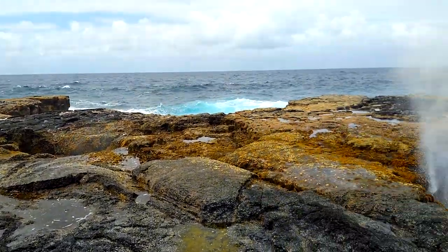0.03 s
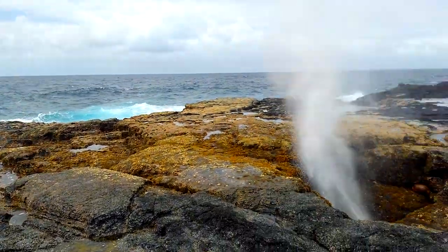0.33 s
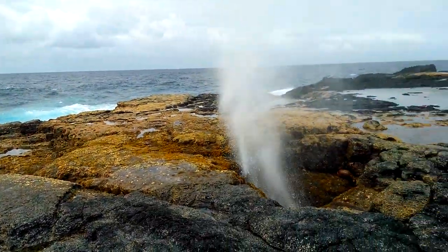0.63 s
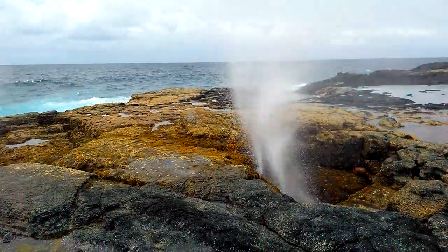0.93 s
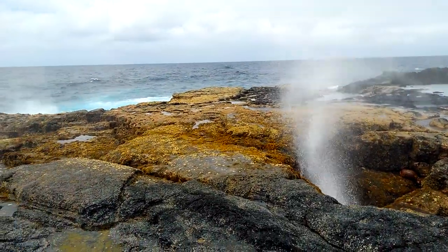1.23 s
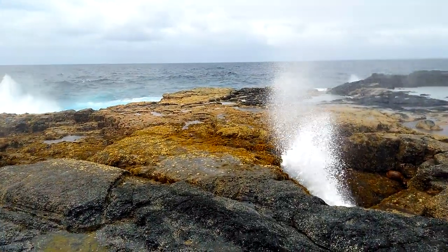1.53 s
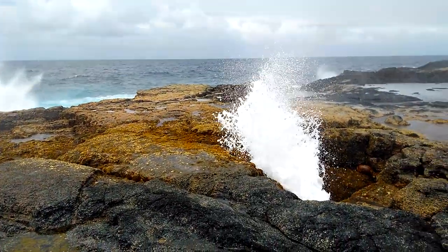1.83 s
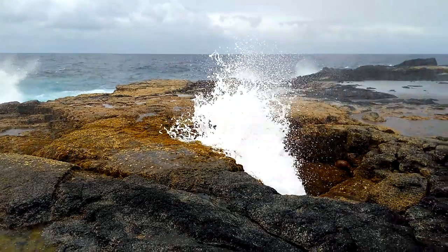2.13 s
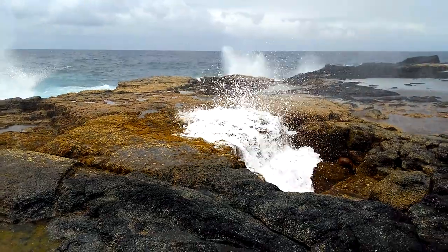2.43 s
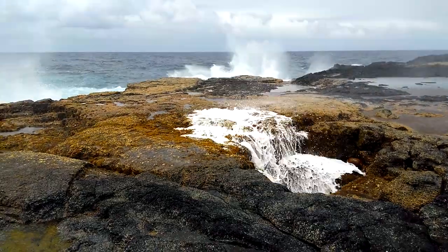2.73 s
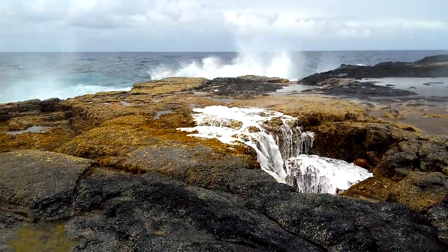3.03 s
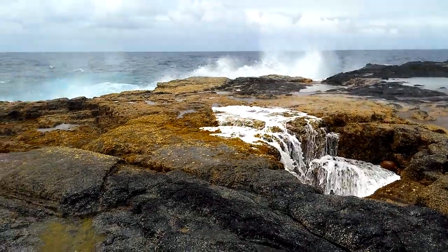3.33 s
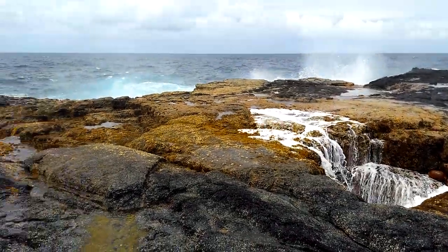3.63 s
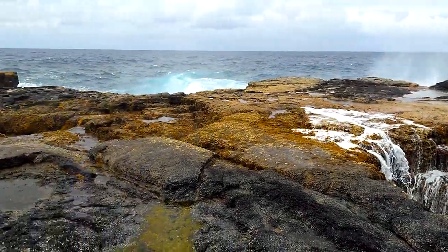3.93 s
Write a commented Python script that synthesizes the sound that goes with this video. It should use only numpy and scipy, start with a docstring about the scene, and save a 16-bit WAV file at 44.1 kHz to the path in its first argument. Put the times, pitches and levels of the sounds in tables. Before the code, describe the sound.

A blowhole hisses and sprays in surges, strongest at about 0.1 and 1.2 seconds and again around 2.4, with pattering drops and a very faint breathy whistle. Surf roars behind it, and water washes over the rock near 1.2 and 2.3 seconds. The hiss dies away by 3 seconds. Gusty wind rumbles and thumps on the microphone throughout, hardest just before 4 seconds.

```python
"""A blowhole on a rock shelf blows a hissing jet of mist and water, and its spray splashes down on the rock.
The mouth adds a faint, breathy whistle that sinks from one blow to the next as water fills it.
Behind it surf roars and water washes over the shelf. Gusty wind rumbles and thumps on the two ports of
a small microphone, whose stereo widener feeds each port, delayed and inverted, into the other channel."""
import sys
import numpy as np
from scipy import signal
from scipy.fft import rfft, irfft, next_fast_len
from scipy.io import wavfile
from scipy.ndimage import uniform_filter1d, minimum_filter1d, map_coordinates

SR = 44100
rng = np.random.default_rng(int(sys.argv[2]) if len(sys.argv) > 2 else 0)


def log_audio(samples):
    """Write samples as a 16-bit WAV file to the path given in sys.argv[1]."""
    # one column per channel
    frames = np.atleast_2d(samples).T
    # limit to full scale, then quantise
    limited = np.clip(frames, -1, 1)
    pcm = np.round(limited * 32767).astype(np.int16)
    wavfile.write(sys.argv[1], SR, pcm)


N = 176400


def amp(db):
    """Decibels to gain."""
    return 10 ** (np.asarray(db) / 20)


def unit(x):
    """Scale to rms 1."""
    return x / np.sqrt(np.mean(x ** 2) + 1e-20)


def along(points, hz):
    """Read (f/Hz, value) points on a log frequency axis."""
    freqs, values = np.transpose(points)
    return np.interp(np.log(hz + 1), np.log(freqs + 1), values)


def envelope(rows):
    """One value per sample from (t/s, value) breakpoints."""
    return np.interp(np.arange(N) / SR, *np.transpose(rows))


def wobble(per_s):
    """Smooth random modulation with per_s knots a second."""
    return map_coordinates(rng.standard_normal(4096), [np.arange(N) * per_s / SR], mode="wrap")


def filtered(x, response):
    """Filter x by a complex response, given as a function of frequency."""
    size = next_fast_len(N + SR // 2)
    return irfft(rfft(x, size) * response(np.fft.rfftfreq(size, 1 / SR)), size)[..., :N]


def noise_bed(colour, alike, patchy_db):
    """Coloured noise of rms 1, mottled in time and frequency; alike is the correlation of the ports."""
    spectra = signal.stft(rng.standard_normal((2, N)), nperseg=512)[2]
    patches = uniform_filter1d(rng.standard_normal(spectra.shape[1:]), size=7, axis=0)
    patches = uniform_filter1d(patches, size=10, axis=1)
    mid, side = signal.istft(spectra * amp(patchy_db * unit(patches)), nperseg=512)[1][:, :N]
    width = np.arccos(alike) / 2
    mid, side = mid * np.cos(width), side * np.sin(width)
    return unit(filtered(np.array([mid + side, mid - side]), lambda hz: amp(along(colour, hz))))


# Rise and fall of the gusts: t/s, level/dB
GUSTS = [(0, -29), (.18, -31), (.25, -31), (.46, -34.5), (.61, -33.5), (.68, -26), (.77, -29), (.85, -35),
         (1.02, -30), (1.12, -32.5), (1.33, -28.5), (1.48, -28.5), (1.59, -29.5), (1.68, -25), (1.85, -33),
         (1.99, -35), (2.17, -32), (2.3, -29), (2.38, -36), (2.46, -26.5), (2.61, -34.5), (2.75, -34),
         (2.82, -29), (3.01, -29.5), (3.17, -30), (3.3, -34), (3.47, -33.5), (3.6, -25.5), (3.68, -27.5),
         (3.78, -25.5), (3.88, -22), (3.93, -24.5), (3.97, -26.5), (4, -22)]
# Tone of the low rumble: f/Hz, level/dB
RUMBLE_EQ = [(20, -31), (35, -24), (60, -5.5), (130, 3), (220, -2), (380, -14.5), (700, -34.5),
             (1300, -46.5), (3000, -79)]
# Tone of the flutter: f/Hz, level/dB
FLUTTER_EQ = [(80, -46), (200, 4), (350, 0.5), (700, -10), (1200, -27), (2200, -50), (5000, -67)]

def wind(lee_gain=0.55, flutter_growth=1.78):
    """Gusts drive a low rumble and a spikier, brighter flutter, mostly on the windward port."""
    strength_db = envelope(GUSTS)
    mean_db = strength_db.mean()
    gust_db = strength_db - mean_db + .5 * wobble(30.13)
    rumble_db = 11.5 + gust_db + 1.8 * wobble(90)
    rumble = amp(rumble_db) * noise_bed(RUMBLE_EQ, alike=0.15, patchy_db=0.58)
    flutter_db = -5 + flutter_growth * gust_db + 3.8 * wobble(170)
    flutter = amp(flutter_db) * noise_bed(FLUTTER_EQ, alike=0.15, patchy_db=-1)
    return amp(mean_db) * (rumble + flutter) * np.array([[1], [lee_gain]])


# Eddies hitting the microphone: t/s, length/s, level/dB, upper edge f/Hz
EDDY_HITS = [(.079, 0.021, -12.5, 306), (.198, 0.0026, -7.5, 754), (0.208, 0.017, -10, 590),
             (.219, 0.02, -8, 229), (0.551, 0.0048, -18, 223), (0.639, 0.0052, -11, 222),
             (0.714, 0.021, -22, 565), (.745, 0.0088, -15, 278), (0.777, 0.016, -10, 232),
             (1.018, 0.0026, -20, 465), (1.074, 0.013, -9.5, 188), (1.14, 0.003, -22, 550),
             (1.172, 0.015, -14.5, 420), (1.23, 0.012, -10.5, 231), (1.276, 0.015, -12, 270),
             (1.334, 0.011, -10.5, 390), (1.496, 0.003, -14.5, 448), (1.636, 0.0068, -20, 340),
             (1.746, 0.02, -12.5, 248), (1.919, 0.011, -12, 213), (2.145, 0.0082, -9.5, 355),
             (2.495, 0.016, -8, 253), (2.534, 0.006, -17, 555), (2.795, 0.0026, -15, 420),
             (2.918, 0.0042, -13, 348), (2.949, 0.0049, -11, 513), (2.963, 0.013, -9.5, 220),
             (3.071, .008, -12, 200), (3.095, 0.0087, -10, 290), (3.148, .005, -20.5, 603),
             (3.169, 0.0071, -17.5, 500), (3.277, 0.0082, -16, 278), (3.403, 0.0055, -13.5, 220),
             (3.525, 0.0056, -16, 384), (3.596, 0.0044, -10, 402), (3.623, 0.0091, -21, 280),
             (3.824, 0.024, -8.5, 170), (3.879, 0.019, -2, 190), (3.896, 0.005, -2, 240),
             (3.922, 0.0091, -6.5, 340), (3.9357, 0.0025, -2.5, 800), (3.981, 0.0063, -3, 340)]

def wind_thumps(lee_gain=0.083, crack_s=3.9355, crack_hz=3500):
    """Single eddies strike the windward port: one push of pressure inside a short burst of turbulence."""
    t = np.arange(SR // 4) / SR - 1 / 8
    hz = np.fft.rfftfreq(len(t), 1 / SR)
    push = signal.unit_impulse(len(t), "mid")
    track = np.zeros(N + SR)
    for at_s, length_s, db, edge_hz in EDDY_HITS:
        window = np.exp(-2 * (t / length_s) ** 2)
        band = hz / np.hypot(hz, .3 * edge_hz) / (1 + (hz / edge_hz) ** 3.81)
        shaped = lambda x: unit(irfft(rfft(x) * band, len(t)))
        turbulence = shaped(rng.standard_normal(len(t)) * window)
        roughness = 0.77 * length_s / 0.0048  # longer eddies are rougher
        eddy = unit(shaped(push) + roughness * turbulence)
        track[round(at_s * SR):][:len(t)] += amp(db) * eddy * np.sqrt(np.mean(window ** 2))
    thumps = track[len(t) // 2:][:N]  # centre each thump on its cue
    # The hardest eddy lands with a sharp crack.
    click = signal.unit_impulse(N, round(crack_s * SR))
    crack = filtered(click, lambda f: 1 / (1 + 1j * f / crack_hz) ** 2)
    return (thumps + amp(-11) * crack) * np.array([[1], [lee_gain]])


# Swells of the breakers: t/s, level/dB
SURF_SWELLS = [(0, -28.5), (.12, -41), (.33, -47.5), (.59, -38.5), (.78, -33), (.95, -37), (1.3, -34),
               (1.7, -41), (1.9, -43), (2.07, -44), (2.35, -35), (2.58, -50), (3.15, -46), (3.4, -45),
               (3.55, -47.5), (3.83, -45.5), (4, -52)]
# Tone of their roar: f/Hz, level/dB
SURF_EQ = [(60, -0.5), (250, 12.5), (500, 10), (900, 7.5), (1300, -9), (1900, -2.5), (2600, -23.5),
           (4000, -35), (7000, -33.5), (15000, -41)]

def surf():
    """Breakers roar along the shelf."""
    roar_db = envelope(SURF_SWELLS) - 1 + 1.5 * wobble(26)
    return amp(roar_db) * noise_bed(SURF_EQ, alike=0.89, patchy_db=-0.8)


# Surges of water across the shelf: t/s, level/dB
WASH_SURGES = [(0, -54.5), (1.2, -40), (1.6, -46.5), (2.1, -46), (2.35, -39), (2.6, -57), (3.2, -57.5),
               (3.48, -50), (4, -50.5)]
# Tone of the running water: f/Hz, level/dB
WASH_EQ = [(500, 6), (1100, -0.5), (1600, -0.5), (2100, -2), (2800, -8.5), (4000, -26), (8000, -47)]

def wash():
    """Water runs over the rock and drains away in a wide, churning wash."""
    return amp(envelope(WASH_SURGES)) * noise_bed(WASH_EQ, alike=0.1, patchy_db=5.0)


# Narrow resonances of the blowhole's mouth: centre t/s, half length/s, f/Hz, level/dB
WHISTLES = [(.7, 0.37, 4370, -62), (1.254, .17, 3370, -56), (2.318, 0.25, 2950, -55.5)]

def mouth_whistle(width_hz=250):
    """The mouth rings with a faint, breathy whistle, lower each time as water fills it."""
    t, out = np.arange(N) / SR, np.zeros((2, N))
    for centre_s, half_s, pitch_hz, db in WHISTLES:
        resonance = lambda hz: 1 / (1 + (2 * (hz - pitch_hz) / width_hz) ** 2)
        breath = unit(filtered(rng.standard_normal((2, N)), resonance))
        swell = np.exp(-((t - centre_s) / half_s) ** 4)
        out += amp(db) * swell * breath
    return out


def spray_drops(per_s=990, centre_hz=2620, spread_octaves=2.4, ring_cycles=3.2):
    """Drops of spray hit the rock: tiny damped pings, scattered between the ports."""
    when, size, pan, pitch = rng.random((int(per_s * N / SR), 4)).T
    hz = centre_hz * 2 ** (spread_octaves * (pitch - .5))
    drop_db = np.minimum(-4 * np.log(1 - size), 13)  # many soft drops, a few loud ones
    age = np.arange(SR // 200)
    cycles = hz[:, None] * age / SR
    pings = amp(drop_db)[:, None] * np.sin(2 * np.pi * cycles) * np.exp(-2 * cycles / ring_cycles)
    at = ((when * N).astype(int)[:, None] + age).ravel()
    ports = [np.bincount(at, (pings * gain[:, None]).ravel(), N)[:N] for gain in (pan, 1 - pan)]
    return unit(np.array(ports))


# Plumes of mist: t/s, level/dB
MIST_PLUMES = [(0, -52.5), (.12, -45), (.37, -48.5), (.55, -47), (.75, -45.5), (.83, -48), (1.24, -47.5),
               (1.38, -51), (1.68, -52.5), (1.79, -70), (1.88, -58), (1.96, -61), (2.08, -51.5),
               (2.2, -53.5), (2.33, -48.5), (2.48, -48), (2.52, -53), (2.65, -49.5), (2.88, -52.5),
               (3.02, -62), (3.19, -78.5), (3.36, -71.5), (3.6, -65), (3.9, -74.5), (4, -67)]
# Tone of their hiss: f/Hz, level/dB
MIST_EQ = [(1500, 4.5), (4000, -53), (6000, -10.5), (7300, 0), (8500, 3.5), (10000, 2.5), (12000, 5),
           (14300, 5), (15600, 2.5)]

def mist():
    """Fine mist blown from the hole gives a wide, airy hiss."""
    hiss_db = envelope(MIST_PLUMES) + 4.5 + 0.34 * wobble(30.96)
    return amp(hiss_db) * noise_bed(MIST_EQ, alike=0.073, patchy_db=1.64)


# Blows of the jet: t/s, level/dB
JET_BLOWS = [(0, -45), (.13, -36.5), (.35, -43.5), (.54, -46.5), (.7, -43), (.9, -44.5), (1.06, -46),
             (1.2, -40.5), (1.38, -47.5), (1.48, -52.5), (1.7, -53), (1.79, -64), (1.99, -66),
             (2.11, -53.5), (2.22, -54.5), (2.42, -45), (2.53, -50), (2.72, -49), (2.92, -64), (3.2, -70.5),
             (3.65, -60), (3.83, -63), (4, -62)]
# Tone of its rush: f/Hz, level/dB
JET_EQ = [(300, -23), (900, 14.5), (1400, 4.5), (2100, 5.5), (2800, 2.5), (3500, 1), (4600, -6),
          (6000, -10.5), (9000, -7), (15000, -46)]

def blowhole_jet():
    """Air and water rush from the hole, shedding drops whose patter swells with each blow."""
    blow_db = envelope(JET_BLOWS) + .5 * wobble(24.2)
    rush = amp(0.5) * noise_bed(JET_EQ, alike=0.03, patchy_db=2.5)
    return amp(blow_db) * (rush + amp(-17) * spray_drops())


def scene():
    """All layers as pressure at the two ports, windward first."""
    return wind() + wind_thumps() + surf() + wash() + blowhole_jet() + mist() + mouth_whistle()


def limiter(x, ceiling=.99, hold_s=0.017):
    """The gain ducks briefly around peaks above the ceiling."""
    hold = int(hold_s * SR)
    needed_gain = np.minimum(1, ceiling / (np.abs(x).max(axis=0) + 1e-9))
    return x * uniform_filter1d(minimum_filter1d(needed_gain, hold), hold)


# Widener crossfeed into the left channel: f/Hz, gain
FEED_LEFT = [(60, 0.86), (500, 1), (1200, 0.47), (2500, 1), (6000, 1), (8500, 0.31), (10500, 0.032)]
# Widener crossfeed into the right channel: f/Hz, gain
FEED_RIGHT = [(60, 0.88), (500, 0.68), (1200, 0.41), (2500, 1), (6000, 1), (8500, 0.082), (11000, 0.3),
              (15000, 0.72)]
# Stereo balance, left over right: f/Hz, level/dB
BALANCE = [(100, -2.5), (1000, -3), (4000, -0.5), (8000, -2), (13000, -3)]

def widener(ports, delay_s=.0004):
    """Each port bleeds, delayed and inverted, into the other channel; the image leans to the right."""
    def crossfeed(hz):
        gains = np.array([along(FEED_LEFT, hz), along(FEED_RIGHT, hz)])
        return gains * np.exp(-2j * np.pi * hz * delay_s)
    wide = ports - filtered(ports[::-1], crossfeed)
    return filtered(wide, lambda hz: amp(along(BALANCE, hz) * np.array([[.5], [-.5]])))


def record(dry, fade_s=.004, low_cut_hz=48, top_hz=15600):
    """The microphone chain: widener, short fades at both ends, limiter, bass roll-off and top cut."""
    t = np.arange(N) / SR
    fade = np.sin(np.pi / 2 * np.minimum(1, np.minimum(t, t[::-1]) / fade_s)) ** 2
    passband = lambda hz: (hz < top_hz) * hz ** 4 / np.hypot(hz ** 4, low_cut_hz ** 4)
    return filtered(limiter(widener(dry) * fade), passband)


dry = scene()
out = record(dry)
log_audio(out)
```